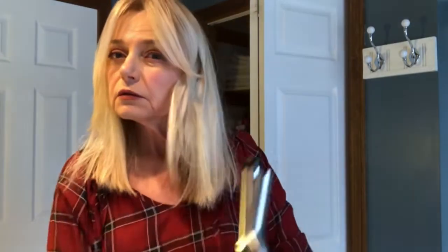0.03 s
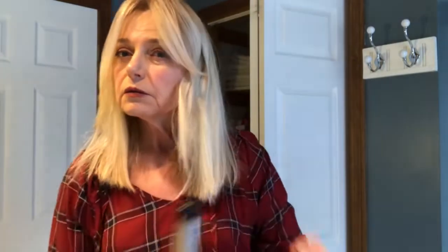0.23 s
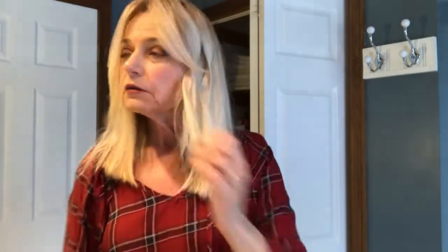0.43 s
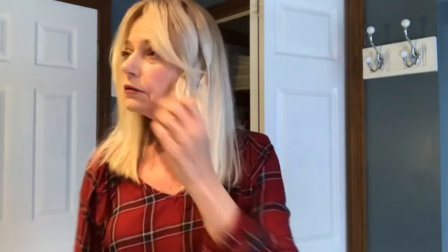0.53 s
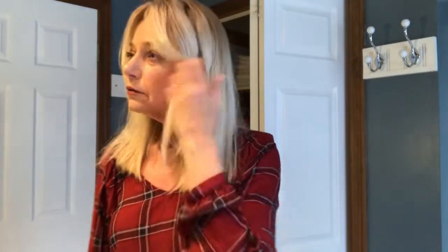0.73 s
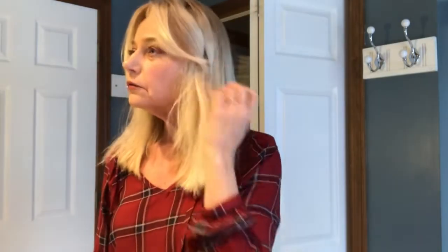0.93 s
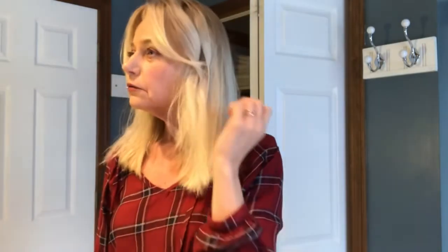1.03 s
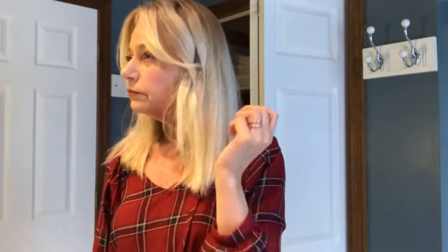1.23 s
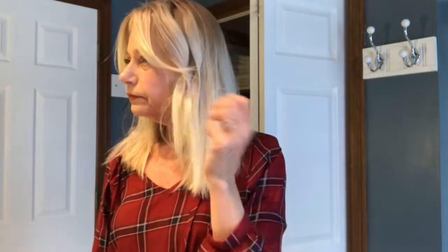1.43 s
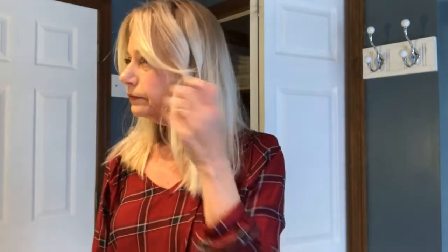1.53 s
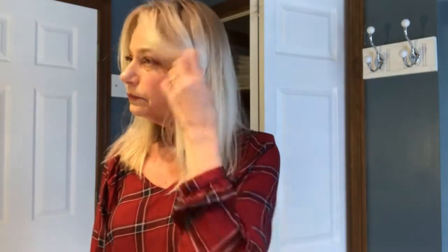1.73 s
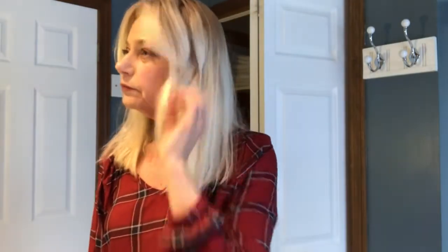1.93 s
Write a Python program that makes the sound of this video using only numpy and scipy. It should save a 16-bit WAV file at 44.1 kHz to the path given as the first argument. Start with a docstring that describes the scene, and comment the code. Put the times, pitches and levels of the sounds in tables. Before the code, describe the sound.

A hair straightener is handled in a small, quiet room. At about 0.25 seconds its hinge squeaks very briefly and it snaps open with a short metallic ring. A hollow clatter follows at 0.6 seconds and light ticks around 1 second. It is set down with a sharp clack at 1.5 seconds and two quick tabletop knocks, then a soft bump near 2 seconds. Each hit echoes briefly.

```python
"""Handling a hair straightener

In a small, bare room the hinge sticks and squeaks, then the arms snap open and the metal plates ring.
Hollow clatters and light ticks of the casing follow. As the tool is put down there is a sharp clack,
two knocks that shake the tabletop, and a soft bump. Each hit has a short echo, over faint noise."""
import sys
import numpy as np
from scipy import signal
from scipy.fft import rfft, irfft
from scipy.io import wavfile

SR = 44100
rng = np.random.default_rng(int(sys.argv[2]) if len(sys.argv) > 2 else 0)


def file_out(sig):
    """Save sig as 16-bit WAV at sys.argv[1]."""
    # one column per channel
    cols = np.atleast_2d(sig).T
    # limit, then scale
    lim = np.clip(cols, -1, 1)
    pcm = np.round(lim * 32767).astype(np.int16)
    wavfile.write(sys.argv[1], SR, pcm)


N = 88200
T = np.arange(SR * 3 // 4) / SR  # seconds since the start of one hit
FFT_SIZE = 2 ** 16
HZ = np.fft.rfftfreq(FFT_SIZE, 1 / SR)


def amp(db):
    """Turn decibels into a number to multiply by."""
    return 10 ** (np.asarray(db) / 20)


def along(points, hz):
    """Read between (frequency, value) points, giving each octave about equal space."""
    frequencies, values = np.transpose(points)
    return np.interp(np.log(hz + 1), np.log(frequencies + 1), values)


def add(track, start_s, sound):
    """Mix a sound into the track at the given time."""
    part = track[round(start_s * SR):][:len(sound)]
    part += sound[:len(part)]


def noise(spectrum):
    """Steady noise with the given tone colour and an average (rms) size of 1."""
    white = rfft(rng.standard_normal(N))
    shaped = irfft(white * amp(along(spectrum, np.fft.rfftfreq(N, 1 / SR))), N)
    return shaped / shaped.std()


def colour(sound, spectrum, treble_limit_hz=SR):
    """Give a sound a tone colour. Only the shape of the spectrum counts, not its overall level."""
    gain = amp(along(spectrum, HZ)) / np.sqrt(1 + (HZ / treble_limit_hz) ** 4)
    gain *= np.sqrt(SR / 1000 / np.mean(gain ** 2))  # energy of one millisecond at full scale
    # fold the filter forward in time, so that nothing sounds before the hit
    cepstrum = irfft(np.log(gain + 1e-6))
    cepstrum[1:FFT_SIZE // 2] *= 2
    cepstrum[FFT_SIZE // 2:] = 0
    return irfft(rfft(sound, FFT_SIZE) * np.exp(rfft(cepstrum)))[:len(T)]


def contact(length_s):
    """Two things touch: a brief, uneven burst of force with energy 1."""
    spectrum = rfft(rng.standard_normal(len(T)) * amp(-60 * T / length_s), FFT_SIZE)
    for _ in range(2):  # even out the frequencies, then cut back to length
        burst = irfft(spectrum / (np.abs(spectrum) + 1e-9))[:len(T)] * (T < length_s)
        spectrum = rfft(burst, FFT_SIZE)
    return burst / np.linalg.norm(burst)


def ring(modes, attack_s):
    """A struck object's own tones (modes). Each drops 60 dB in its fade time; levels vary by hit."""
    tones = sum((-1) ** k * amp(db + rng.normal() - 60 * T / fade_s) * np.sin(2 * np.pi * hz * T)
                for k, (hz, db, fade_s) in enumerate(modes))
    return (1 - np.exp(-T / attack_s)) * tones


def room_echo():
    """Reflections from the walls blur into a tail of noise whose treble dies first."""
    # how long the room takes to drop 60 dB (frequency [Hz], fade time [s])
    fade_times = [(100, 0.53), (260, .44), (700, 0.46), (1800, 0.35), (4800, 0.35), (8000, 0.3),
                  (12800, 0.24)]
    gap_s, build_s = 0.00083, 0.00033
    hz, t, bands = signal.stft(rng.standard_normal(len(T)), SR, nperseg=256)
    fade = amp(-60 * t / along(fade_times, hz)[:, None])
    tail = signal.istft(bands * fade, SR, nperseg=256)[1][:len(T)]
    tail *= 1 - np.exp(-np.maximum(T - gap_s, 0) / build_s)
    return tail / np.linalg.norm(tail)


def room_tone():
    """Faint, steady rumble and hiss."""
    # tone colour of the background (frequency [Hz], relative level [dB])
    spectrum = [(15, -47), (25, -34), (69, -2.5), (178, -11.5), (209, -8.5), (359, -8), (1020, -14.5),
                (1110, -13), (1200, -17), (1300, -17), (2010, -19.5), (6550, -23), (15500, -34)]
    return amp(-65.5) * noise(spectrum)


def rubs():
    """The tool shifts in the hand, making faint swells of friction noise."""
    # small slips (time [s], level [dB], half length [s])
    slips = [(.004, -62, 0.024), (0.207, -63, 0.034)]
    # tone colour of the rubbing (frequency [Hz], relative level [dB])
    spectrum = [(200, -5), (1000, -2), (2000, -6.5), (3500, -3), (5000, -11.5), (7000, -11.5), (14000, -26)]
    t = np.arange(N) / SR
    swells = sum(amp(db) * np.exp(-((t - s) / half_s) ** 2) for s, db, half_s in slips)
    return noise(spectrum) * swells


def bumps():
    """Soft low thuds, and a low swell of the room just after the snap."""
    # thuds and the room's swell (time [s], level [dB], echo [dB])
    low_sounds = [(0.102, -52.5, -6), (.283, -52, 7), (1.9630, -38, 4.5)]
    # their tone colour (frequency [Hz], relative level [dB])
    spectrum = [(40, -41), (120, -0.5), (280, 4), (360, -1), (480, -13), (700, -9.5), (1200, -27.5),
                (2500, -39), (8000, -46)]
    out = np.zeros(N)
    for s, db, echo_db in low_sounds:
        add(out, s, amp(db) * colour(contact(length_s=0.034) + amp(echo_db) * room_echo(), spectrum))
    return out


def casing_hits(hits, spectrum):
    """Something hard meets the casing: a crack, the casing's ring and a duller echo."""
    # tones of the casing (frequency [Hz], level [dB], fade time [s])
    modes = [(2630, -1, 0.079), (2960, -5, 0.068), (4430, -7, 0.37), (4620, -13, 0.42), (4600, -15, 0.54)]
    out = np.zeros(N)
    for s, db, length_s, echo_db, ring_db, treble_limit_hz in hits:
        crack = colour(contact(length_s), spectrum)
        echo = amp(echo_db) * colour(room_echo(), spectrum, treble_limit_hz)
        ringing = amp(ring_db) * ring(modes, attack_s=0.0023)
        add(out, s, amp(db) * (crack + echo + ringing))
    return out


def taps():
    """Light, dull touches on the casing."""
    # taps (time [s], level [dB], contact length [s], echo [dB], ring [dB], echo's treble limit [Hz])
    hits = [(1.0942, -44, .003, 7, -37, 9000), (1.8958, -49, 0.0061, 1.5, -31, 4000)]
    # tone colour of a tap (frequency [Hz], relative level [dB])
    spectrum = [(60, -15), (130, -4), (250, 1), (700, -1), (1100, 0), (1900, 0.5), (2500, -2), (3400, -2.5),
                (4000, -7.5), (4900, -7), (5800, -18.5), (8000, -24.5), (15000, -37)]
    return casing_hits(hits, spectrum)


def tick():
    """A light, bright touch on the casing."""
    # tick (time [s], level [dB], contact length [s], echo [dB], ring [dB], echo's treble limit [Hz])
    hits = [(.9660, -42.5, 0.0053, -2.5, -32, 12200)]
    # tone colour of the tick (frequency [Hz], relative level [dB])
    spectrum = [(200, -40), (900, -17), (1900, -16), (2400, 1.5), (3200, -11.5), (4600, 0), (5900, -6.5),
                (7300, -2), (8500, -13), (15000, -20)]
    return casing_hits(hits, spectrum)


def clatter():
    """Dull, hollow contacts, heard mostly through their echo."""
    # contacts (time [s], level [dB], contact length [s], echo [dB], treble limit [Hz])
    hits = [(0.5877, -34.5, 0.018, 7, 4630), (0.5973, -36.5, 0.0091, 8, 7000),
            (0.715, -47.5, 0.048, 3.5, 6040)]
    # tone colour of the clatter (frequency [Hz], relative level [dB])
    spectrum = [(50, -22), (120, -5), (200, -0.5), (330, -3.5), (600, 2), (800, 1), (950, -3.5),
                (1200, -0.5), (1600, 2), (2100, -3.5), (3400, -9), (4100, -11), (5500, -11.5),
                (6200, -13.5), (9000, -25.5), (15000, -28)]
    # tones of the hollow ring (frequency [Hz], level [dB], fade time [s])
    modes = [(120, 0, .58), (200, 0, .42), (595, 0, .42), (780, -3, .25), (1095, -3, .28), (1250, -4, .32),
             (1477, -3, .3), (1558, -1, .3)]
    out = np.zeros(N)
    for s, db, length_s, echo_db, treble_limit_hz in hits:
        hit = colour(contact(length_s) + amp(echo_db) * room_echo(), spectrum, treble_limit_hz)
        ringing = amp(-19) * ring(modes, attack_s=0.014)
        add(out, s, amp(db) * (hit + ringing))
    return out


def clack():
    """A sharp hit that sets the casing ringing as the tool is put down."""
    # clack (time [s], level [dB], contact length [s], echo [dB], ring [dB], echo's treble limit [Hz])
    hits = [(1.5405, -27, 0.0027, 2, -13.5, 8500)]
    # tone colour of the clack (frequency [Hz], relative level [dB])
    spectrum = [(240, -26), (600, -27), (900, -19), (1500, -11.5), (1900, -25.5), (2700, -4), (3600, -9),
                (4400, -2), (5300, -17), (7700, -10.5), (9000, -19), (11700, -14), (13000, -23),
                (15500, -27)]
    return casing_hits(hits, spectrum)


def table_knocks():
    """Blows bend the tabletop in waves that bring the treble first and the bass last."""
    # blows (time [s], level [dB], echo [dB], treble limit [Hz])
    blows = [(1.575, -23, 2, 3060), (1.6554, -21.5, 1, 5040)]
    # tone colour of the tabletop (frequency [Hz], relative level [dB])
    spectrum = [(30, -38), (60, -23), (120, -2.5), (220, 1.5), (320, 2), (450, 0.5), (800, 2), (1250, 2),
                (2000, -12), (3600, -18), (5500, -25), (14000, -24.5)]
    # tones of the tabletop (frequency [Hz], level [dB], fade time [s])
    modes = [(64, -11, .8), (130, -9, .45), (211, 0, .42), (298, -3, .3), (358, -4, .42), (535, -4, .3),
             (662, -3, .33), (822, 1, .35), (1034, 2, .3), (1211, -3, .38), (1248, -4, .42)]
    travel_s = 0.00268  # time a 1 kHz wave takes to cross the tabletop
    wave = irfft(np.exp(-4j * np.pi * travel_s * np.sqrt(1000 * HZ)))[:len(T)]
    out = np.zeros(N)
    for s, db, echo_db, treble_limit_hz in blows:
        echo = amp(echo_db) * signal.fftconvolve(wave, room_echo())[:len(T)]
        thud = colour(wave + echo, spectrum, treble_limit_hz)
        dulled_modes = [(hz, level - 10 * np.log10(1 + (hz / treble_limit_hz) ** 4), fade_s)
                        for hz, level, fade_s in modes]
        ringing = amp(-23) * ring(dulled_modes, attack_s=0.011)
        add(out, s, amp(db) * (thud + ringing))
    return out


def hinge_squeak():
    """The hinge sticks and slips in a short, high tone just before it lets go."""
    # squeaks (time [s], pitch [Hz], level [dB], half length [s])
    squeaks = [(0.239, 3470, -33.5, 0.0071), (0.252, 3346, -42, 0.0052)]
    overtone_step_db = -12.5
    out, t = np.zeros(N), np.arange(N) / SR
    for s, hz, db, half_s in squeaks:
        tone = sum(amp(overtone_step_db * k) * np.sin(2 * np.pi * (k + 1) * hz * t) for k in range(3))
        out += amp(db) * np.exp(-((t - s) / half_s) ** 2) * tone
    return out


def arms_snap():
    """The arms hit their stop with an echoing crack; they ring briefly, the metal plates for longer."""
    # snap (time [s], level [dB], contact length [s], echo [dB])
    hits = [(0.254, -17, 0.004, -1.5)]
    # tone colour of the crack and its echo (frequency [Hz], relative level [dB])
    spectrum = [(80, -24), (250, -17), (600, -13.5), (1200, -15.5), (1500, -9), (1900, -10.5), (2800, -6.5),
                (3400, 0.5), (4100, -2.5), (4900, -7), (5700, 4), (6200, 2.5), (6800, -3.5), (9000, -7.5),
                (10000, -10.5), (14300, -11.5), (15500, -21)]
    # tones of the arms, muffled by the hand (frequency [Hz], relative level [dB], fade time [s])
    arm_modes = [(1566, -12, 0.014), (3755, -2, 0.018), (5670, -5.5, 0.012), (6090, -3, 0.019),
                 (7600, -12.5, 0.023), (8830, -6, 0.012), (10300, -12, 0.0098), (11600, -18, 0.015),
                 (13100, -22, 0.006), (13600, -10.5, .008), (14700, -11, .007)]
    # tones of the metal plates (frequency [Hz], level [dB], fade time [s])
    plate_modes = [(3470, -4, .3), (4226, -9, .32), (5335, -1, .32), (5642, 2, .29), (6102, 0, .32),
                   (6175, -4, .3), (7625, -11, .27), (8890, -6, .2), (11490, -13, .22), (13860, -12, .2)]
    out = np.zeros(N)
    for s, db, length_s, echo_db in hits:
        blow = contact(length_s)
        arm_ring = ring(arm_modes, attack_s=0.0006)
        arm_ring *= np.sqrt(SR / 1000) / np.linalg.norm(arm_ring)
        arms = signal.fftconvolve(blow, arm_ring)[:len(T)]
        crack = colour(amp(-5.5) * blow + amp(echo_db) * room_echo(), spectrum)
        plates = amp(-25) * ring(plate_modes, attack_s=0.001)
        add(out, s, amp(db) * (arms + crack + plates))
    return out


def scene():
    """Add all the sounds together in one channel."""
    tool = rubs() + hinge_squeak() + arms_snap() + clack() + tick() + taps()
    return (tool + table_knocks() + clatter() + bumps() + room_tone())[None]


def record(dry):
    """Cut away the very highest treble."""
    top_hz, size = 15900, 2 * N
    below_top = np.fft.rfftfreq(size, 1 / SR) < top_hz
    return irfft(rfft(dry, size) * below_top, size)[:, :N]


dry = scene()
out = record(dry)
file_out(out)
```